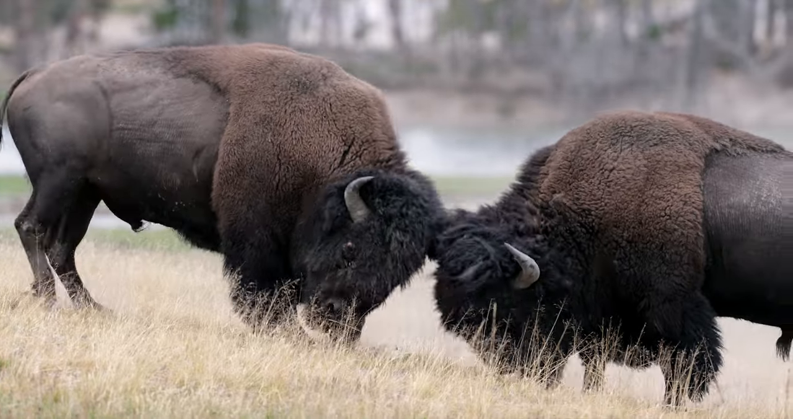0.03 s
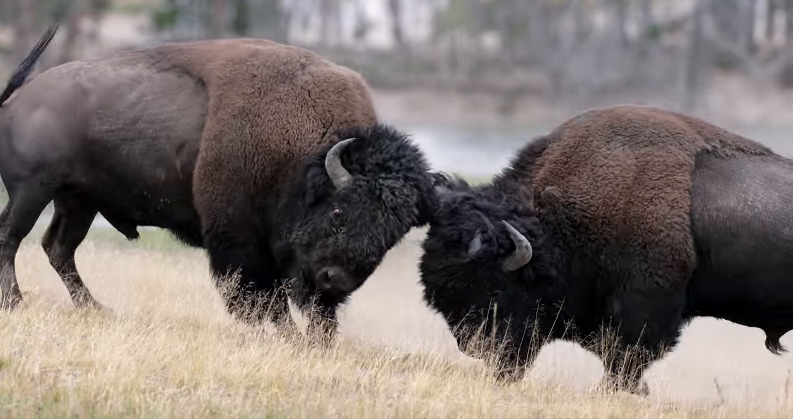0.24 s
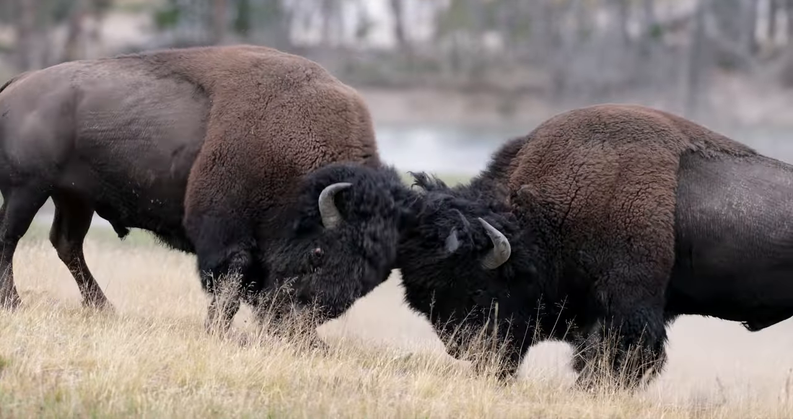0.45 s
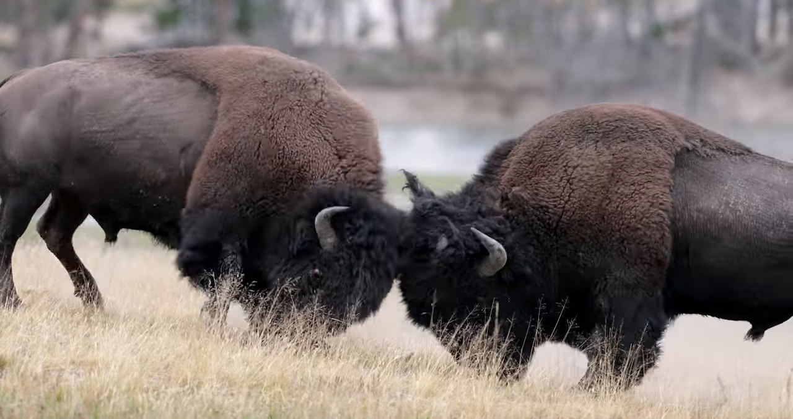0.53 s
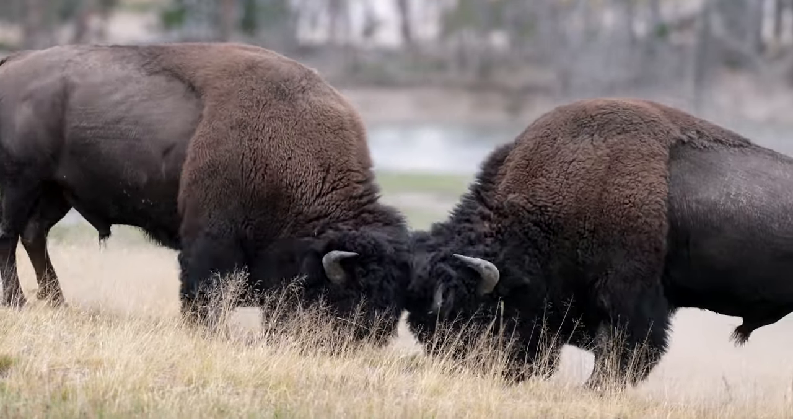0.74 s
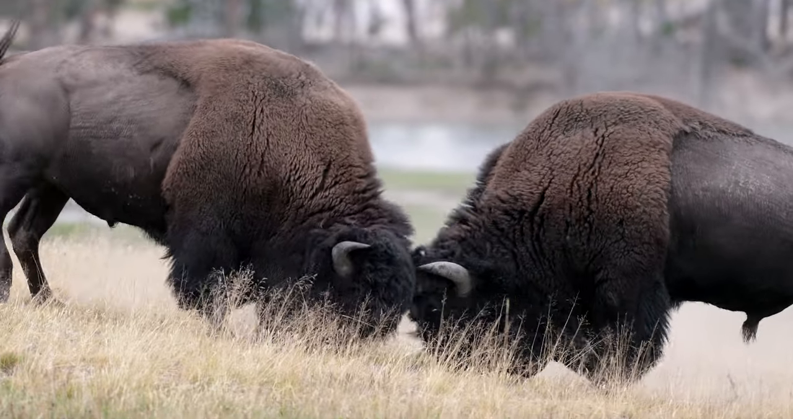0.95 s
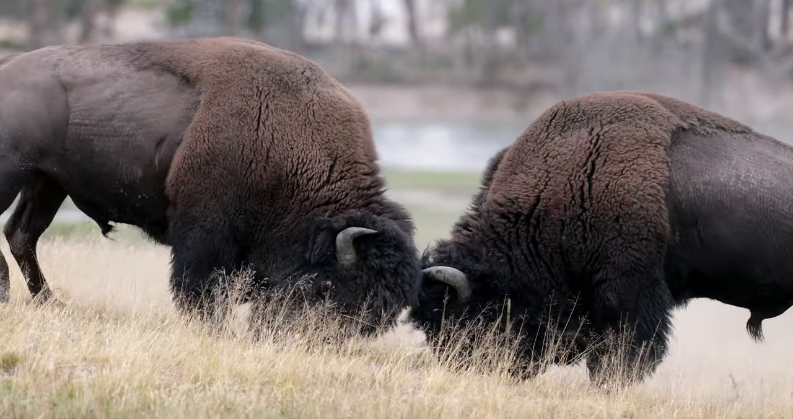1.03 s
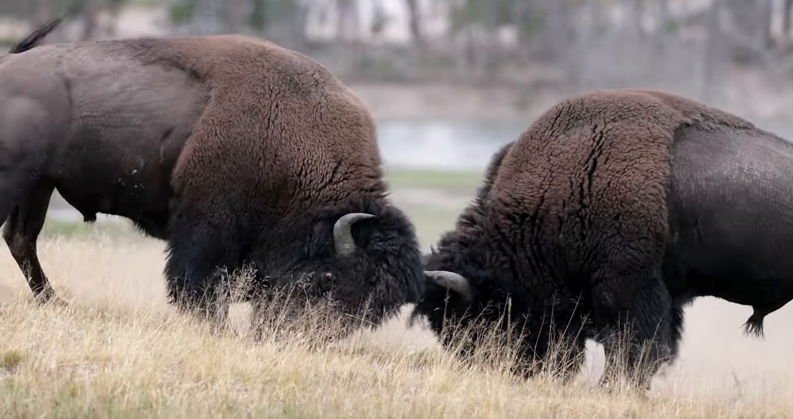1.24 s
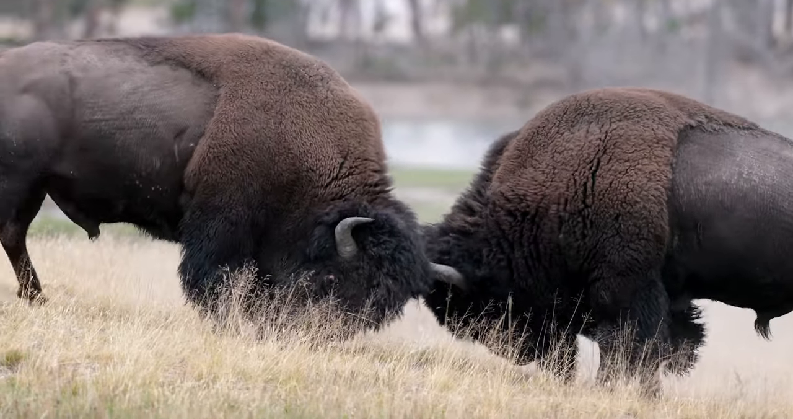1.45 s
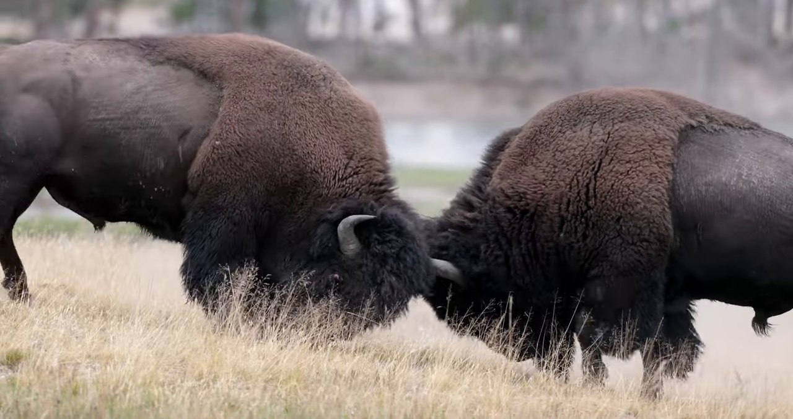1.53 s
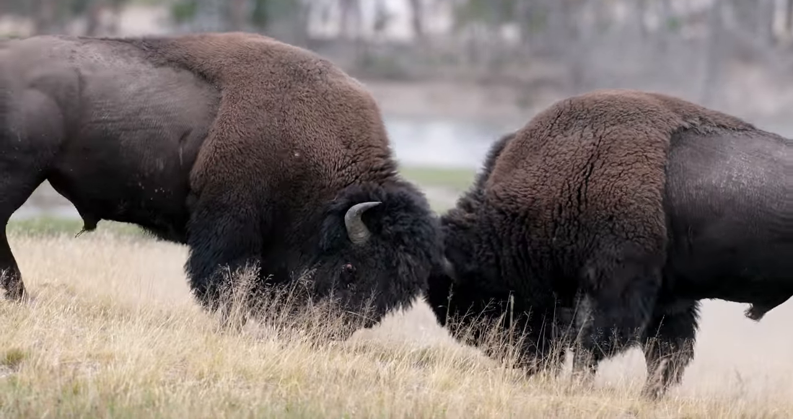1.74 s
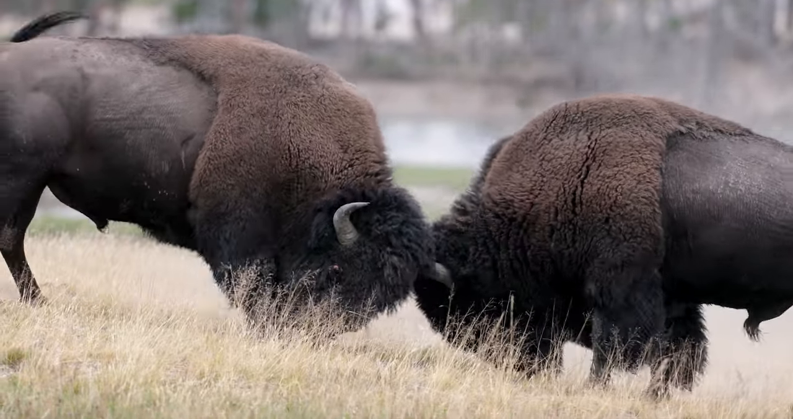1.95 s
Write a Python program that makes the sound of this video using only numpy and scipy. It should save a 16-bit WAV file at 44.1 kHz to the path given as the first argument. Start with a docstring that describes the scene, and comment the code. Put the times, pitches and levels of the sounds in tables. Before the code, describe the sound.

One deep, guttural bison bellow flaps and rasps, slows raggedly, then fades into soft hums and breath.

```python
"""A bison bull bellows once while it shoves a rival in open grassland, over a low wind, all hard left.
Crackles of air, a faint nasal ring and a soft hum open the call. Then slack vocal folds flap about 58 times
a second: each flap strikes a deep throat resonance, the chest and a rattle of higher resonances, and chops
rasping air, with whistling snorts and a thin hiss. The flaps slow and turn ragged, then the voice
dies into soft hums, crackles and airflow; resonators, decaying sines and shaped noise make the sounds."""
import sys
import numpy as np
from scipy import signal
from scipy.fft import rfft, irfft
from scipy.io import wavfile
from scipy.ndimage import uniform_filter1d, map_coordinates

SR = 44100
rng = np.random.default_rng(int(sys.argv[2]) if len(sys.argv) > 2 else 0)


def store_wav(level_fs):
    """Save 16-bit WAV to argv[1]."""
    pcm = np.round(np.clip(np.atleast_2d(level_fs), -1, 1) * 32767)
    wavfile.write(sys.argv[1], SR, pcm.T.astype(np.int16))


N = 88200  # samples, two seconds

# Levels of the sources are set before scene() doubles them on the left.
# tone of one soft flap: freq_hz [Hz], gain_db [dB]
FLAP_TONE = [(25, 0), (60, -9.5), (115, 1.5), (180, 2), (240, 8), (300, -2), (380, -9), (540, -7),
             (650, -29), (1500, -47.5), (6000, -95)]


def amp(db):
    """Decibels to gain."""
    return 10 ** (np.asarray(db) / 20)


def unit(x):
    """Scale to rms 1."""
    return x / np.sqrt(np.mean(x ** 2) + 1e-20)


def steady(x, size=3500):
    """Even out the short-term rms near 1 over size samples, keeping the single flaps."""
    power = uniform_filter1d(uniform_filter1d(unit(x) ** 2, size), size)
    return unit(x) / np.sqrt(np.abs(power) + .01)  # the floor leaves silence quiet


def clock():
    """Time of each sample in seconds."""
    return np.arange(N) / SR


def curves(rows):
    """One value per sample for each column after the time."""
    time_s, *columns = np.transpose(rows)
    return [np.interp(clock(), time_s, column) for column in columns]


def wobble(rate):
    """A smooth random curve, rate knots a second."""
    knots = rng.standard_normal(int(N * rate / SR) + 4)
    return map_coordinates(knots, [clock() * rate])


def swell(centre_s, length_s):
    """A bell-shaped rise and fall, down to exp(-2) at length_s either side."""
    return np.exp(-2 * ((clock() - centre_s) / length_s) ** 2)


def filtered(x, response):
    """Filter x by a response given as a function of frequency."""
    spectrum = rfft(x, 2 * N)
    return irfft(spectrum * response(np.fft.rfftfreq(2 * N, 1 / SR)))[..., :N]


def coloured(x, points):
    """Causal, minimum-phase filter through (Hz, dB) points."""
    freq_hz, gain_db = np.transpose(points)

    def response(f):
        log_gain = np.log(amp(np.interp(np.log(f + 1), np.log(freq_hz), gain_db)))
        cepstrum = irfft(log_gain)
        # folding the cepstrum forward in time gives the minimum phase
        return np.exp(rfft(np.r_[cepstrum[0], 2 * cepstrum[1:N], np.zeros(N)]))
    return filtered(x, response)


def noise(points):
    """Coloured noise of rms 1."""
    return unit(coloured(rng.standard_normal(N), points))


def resonate(x, modes):
    """Ring x through parallel (Hz, width Hz, dB) resonances."""
    def response(f):
        return sum(amp(db) * 1j * f * width / (hz * hz - f * f + 1j * f * width)
                   for hz, width, db in modes)
    return filtered(x, response)


def impulses(times, sizes):
    """One impulse at each time."""
    places = np.clip(np.round(times * SR).astype(int), 0, N - 1)
    return np.bincount(places, sizes, N)


def linger(x, decay_s):
    """Give each impulse an exponential tail."""
    return signal.lfilter([1], [1, -np.exp(-1 / (decay_s * SR))], x)


def bellow():
    """Flapping folds push the boom and chest, strike the rattle and chop the rasping air."""
    # middles: level_db [dB] of one flap; treble: level_db [dB]; first column time_s [s]
    voice = [(0.03, -57, -61.5), (0.17, -36.5, -46), (0.26, -27, -35), (0.48, -25, -34.5),
             (0.78, -25, -35.5), (1.05, -28.5, -35), (1.25, -28.5, -37.5), (1.4, -39.5, -39.5),
             (1.58, -41.5, -44), (1.66, -68.5, -60.5)]
    flap_scatter_db, rattle_scatter_db = 1.1, 2.2
    puff_lead_s, puff_scatter_s = .001, .0025  # air escapes just before the folds slap shut
    boom_share, treble_share = 0.4, 0.27  # how much of an accent reaches the low and high parts

    times, accents = flap_times()
    # the accented flaps take no scatter
    scatter = rng.standard_normal((N, 5))[:len(times)].T * (accents == 0)
    size, edge, bite, slip, stagger = scatter
    push = -amp(boom_share * accents + flap_scatter_db * size)
    middle_db, treble_db = curves(voice)
    hard_db = np.interp(times, clock(), middle_db) + accents + rattle_scatter_db * edge
    sharp_db = treble_share * accents + rattle_scatter_db * bite
    puff_times = times - puff_lead_s + puff_scatter_s * stagger

    low = boom(times, push) + chest_thud(times, push, slip)
    buzz, rasping = high_buzz(puff_times, sharp_db), rasp(puff_times, sharp_db)
    treble = amp(treble_db) * (amp(-5) * buzz + amp(-3.5) * rasping)
    voiced = np.interp(clock(), [.14, .18, 1.58, 1.64], [0, 1, 1, 0])
    mouth_open = np.interp(clock(), [1.65, 1.85], [1, 0])
    return voiced * boom_breaks() * low + mouth_open * (middle_rattle(times, hard_db) + treble)


def flap_times():
    """Uneven flaps of the folds that fall into step with each accent: times and accents in dB."""
    # flapping before the accents shift it: time_s [s], rate_hz [flaps per s], timing scatter_ms [ms]
    flaps = [(0.15, 56, .5), (0.3, 59, .4), (0.49, 61, .4), (0.6, 58, .3), (0.8, 56, .5), (0.96, 58, .3),
             (1.2, 54, .6), (1.3, 42, 2), (1.42, 34, 2.5), (1.6, 39, 3)]
    # flaps that stand out, most as hard pops, each restarting the rhythm:
    # start_s [s], accent_db [dB against the other flaps; weaker in the boom and treble]
    pops = [(0.2791, -9.5), (0.3643, 3), (0.396, 5.5), (0.415, 4.5), (0.448, 7.5), (0.48, 6), (0.568, 7),
            (0.6671, 5.5), (0.719, 3), (0.755, 6.5), (0.773, -2), (0.853, 4.5), (0.9211, -0.5),
            (1.0561, 10.5), (1.125, 12.5), (1.16, 5.5), (1.223, -2.5), (1.2707, 9), (1.2941, 7.5),
            (1.373, 7.5), (1.402, 10.5), (1.4324, 3.5), (1.492, 4)]
    rate, scatter_ms = curves(flaps)
    pop_s, pop_db = np.transpose(pops)
    cycles = np.cumsum(rate) / SR
    at_pop = np.interp(pop_s, clock(), cycles)
    # stretch the cycle count so that each pop falls on a whole flap
    steps = np.maximum(1, np.round(np.diff(at_pop, prepend=0)))
    whole = np.cumsum(steps).astype(int)
    cycles = cycles + np.interp(clock(), pop_s, whole - at_pop)
    times = np.interp(np.arange(int(cycles[-1])), cycles, clock())
    jitter = rng.standard_normal(N)[:len(times)]
    times += jitter * np.interp(times, clock(), scatter_ms) / 1000
    accents = np.zeros(len(times))
    times[whole], accents[whole] = pop_s, pop_db
    return times, accents


def boom(times, push):
    """The flaps drive the deep throat resonance at a drawn level."""
    # level of the deep resonance: time_s [s], level_db [dB]
    boom_level = [(0.19, -33), (0.25, -20), (0.366, -16), (0.55, -17.5), (0.626, -13), (0.675, -19),
                  (0.722, -14.5), (0.81, -15), (0.89, -24.5), (0.96, -16), (1.035, -22.5), (1.165, -17),
                  (1.33, -25.5), (1.43, -26), (1.62, -35.5)]
    return amp(curves(boom_level)[0]) * steady(deep(impulses(times, push)), size=3000)


def deep(x):
    """The lowest throat resonance, a one-pole ring on a carrier that glides with the throat's shape."""
    # it rises a little at the height of the push: time_s [s], pitch_hz [Hz]
    throat = [(0.2, 214), (0.35, 242), (0.48, 243), (0.6, 236.6), (1.0, 228.5), (1.3, 227), (1.8, 225.7)]
    width_hz = 30
    turn = np.exp(2j * np.pi * np.cumsum(curves(throat)[0]) / SR)
    ring = linger(coloured(x, FLAP_TONE) / turn, 1 / (np.pi * width_hz))
    return np.real(turn * ring)


def chest_thud(times, push, slip):
    """Each flap knocks one broad low chest resonance, most of them a little early or late."""
    # level of the thud: time_s [s], level_db [dB]
    thud_level = [(0.15, -54), (0.3, -35), (0.9, -31), (1.25, -32.5), (1.45, -30), (1.6, -37.5)]
    chest_hz, width_hz, slip_s = 115, 180, 0.0011
    knocks = coloured(impulses(times + slip_s * slip, push), FLAP_TONE)
    return amp(curves(thud_level)[0]) * steady(resonate(knocks, [(chest_hz, width_hz, 0)]))


def boom_breaks():
    """Gain curve by which the boom and thud dip for a moment."""
    # dips: centre_s [s], depth_db [dB]
    breaks = [(0.425, -2), (0.577, -8), (0.662, -6), (0.759, -8), (0.835, -11), (0.911, -20),
              (1.049, -13.5), (1.26, -11.5), (1.325, -16), (1.481, -2)]
    return amp(sum(db * swell(s, .011) for s, db in breaks))


def middle_rattle(times, flap_db):
    """Flaps strike the middle resonances of the throat."""
    # pitch_hz [Hz], width_hz [Hz], level_db [dB]
    middles = [(433, 38, -19), (562.2, 45, -11), (919.4, 76, 4), (1158, 51.3, -1)]
    return rattle(times, flap_db, middles, scatter_db=2)


def high_buzz(times, flap_db):
    """Flaps strike the high, narrow resonances of the throat into an even buzz."""
    # pitch_hz [Hz], width_hz [Hz], level_db [dB]
    highs = [(1397, 18, -2), (1586, 17, -0.5), (1800, 18, 0), (2024, 17, -8.5), (2516, 47, -4),
             (2770, 34, -5.5), (3080, 38, -7)]
    return steady(rattle(times, flap_db, highs, scatter_db=5.5))


def rattle(times, flap_db, modes, scatter_db):
    """Each flap rings decaying sines afresh, each a little different in pitch and strength."""
    # tone of the open mouth: freq_hz [Hz], gain_db [dB]
    mouth = [(150, -7.5), (420, 6.5), (590, 4.5), (640, -4), (770, -9), (880, -3), (3200, -4),
             (3900, -18.5), (4700, -11), (9000, -37.5)]
    detune_ratio, attack_s = .012, 0.0022
    t = np.arange(SR // 8) / SR
    hz, width, level = np.transpose(modes)[..., None]
    ring = np.zeros(N + SR)
    for s, db in zip(times, flap_db):
        detune, size, phase = rng.standard_normal((3, len(modes), 1))
        tones = np.sin(2 * np.pi * (hz * (1 + detune_ratio * detune) * t + phase))
        tones *= np.exp(-np.pi * width * t)
        gains = amp(db + level + scatter_db * np.clip(size, -2, 1))
        burst = np.sum(gains * tones, axis=0) * (1 - np.exp(-t / attack_s))
        ring[max(0, round(s * SR)):][:len(t)] += burst
    return coloured(ring[:N], mouth)


def rasp(puff_times, puff_db):
    """Turbulent air, chopped into a decaying puff per flap over a steady leak."""
    # air leaking between flaps, growing as the folds slacken:
    # time_s [s], strength [times the rms of the puffs]
    leak = [(0.4, .3), (1.1, .55), (1.55, 1.3)]
    # tone of the rasp: freq_hz [Hz], density_db [relative dB per Hz]
    rasp_tone = [(200, -6.5), (570, -2), (720, -1.5), (920, -3.5), (1350, 4), (1800, 4.5), (2150, 1),
                 (3100, -7.5), (3550, -14.5), (3900, -41), (4700, -20.5), (5500, -29.5), (6700, -37),
                 (8000, -58)]
    puffs = unit(linger(impulses(puff_times, amp(puff_db)), .0035))
    airflow = curves(leak)[0] + puffs
    return steady(coloured(airflow * rng.standard_normal(N), rasp_tone))


def hum():
    """With little pressure the voice is an almost pure, gliding sine near the deep resonance."""
    # hums before and after the rattle:
    # centre_s [s], length_s [s], pitch_hz [Hz], glide [Hz per s], level_db [dB rms at the peak]
    hums = [(0.13, 0.064, 220.8, 219, -30), (1.642, 0.037, 224, -100, -32), (1.736, 0.038, 220.7, -21, -27),
            (1.816, 0.028, 234.8, 5, -28.5)]
    # overtone lingering as the call ends: centre_s [s], length_s [s], pitch_hz [Hz], level_db [dB rms]
    overtone = (1.7, .2, 470, -61)
    waver = .2  # radians of phase
    out = np.zeros(N)
    for s, length, hz, glide, db in hums:
        t = clock() - s
        phase = 2 * np.pi * (hz * t + glide * t * t / 2) + waver * wobble(90)
        out += amp(db) * swell(s, length) * np.sin(phase)
    s, length, hz, db = overtone
    phase = 2 * np.pi * hz * clock() + waver * wobble(45)
    out += amp(db) * swell(s, length) * np.sin(phase)
    return np.sqrt(2) * out  # sine peak to rms


def nose():
    """Air noise rings one narrow nasal resonance, filtered twice, as the call starts."""
    # faint rings: centre_s [s], length_s [s], level_db [dB]
    nasal = [(0.122, 0.017, -43), (0.185, 0.012, -43)]
    mode = [(710, 15, 0)]  # Hz, width Hz, dB
    ring = steady(resonate(resonate(rng.standard_normal(N), mode), mode))
    return ring * sum(amp(db) * swell(s, length) for s, length, db in nasal)


def muzzle():
    """Turbulent air at the muzzle: snorts, thin hiss, crackles and soft airflow."""
    return snorts() + push_hiss() + soft_air()


def snorts():
    """Short swells of noise with a whistling peak near 1.9 kHz."""
    # centre_s [s], length_s [s], level_db [dB]
    snort_bursts = [(0.177, 0.033, -42.5), (0.21, 0.0081, -33), (0.241, 0.026, -34), (0.249, 0.0043, -31.5),
                    (0.277, 0.008, -33), (0.98, 0.0021, -33), (1.596, 0.027, -43)]
    # freq_hz [Hz], density_db [relative dB]
    snort_tone = [(500, -29.5), (1600, -14), (1920, 7), (2100, -2.5), (2400, -13), (3200, -19.5),
                  (9000, -57)]
    envelope = sum(amp(db) * swell(s, length) for s, length, db in snort_bursts)
    return envelope * steady(noise(snort_tone), size=700)


def push_hiss():
    """Flickering high noise, strongest at the height of the push."""
    # time_s [s], level_db [dB before the flicker]
    hiss_level = [(0.1, -74), (0.39, -57.5), (0.6, -61), (1.2, -73.5)]
    # freq_hz [Hz], density_db [relative dB]
    hiss_tone = [(2000, -11.5), (4300, 4), (6300, -3.5), (7500, -9.5), (15000, -27.5)]
    flicker_db = 3.0 * wobble(120)
    return amp(curves(hiss_level)[0] + flicker_db) * noise(hiss_tone)


def soft_air():
    """Crackles as the call starts and fades, and noise flowing through the throat at the end."""
    # decaying crackles: start_s [s], level_db [dB]
    crackle_hits = [(0.056, -47), (0.085, -41), (0.107, -40.5), (0.16, -41.5), (0.18, -33.5),
                    (1.657, -55.5), (1.71, -50.5), (1.732, -48), (1.805, -56)]
    # closing airflow: time_s [s], level_db [dB] at the deep resonance, level_db [dB] of the airy part
    airflow = [(1.45, -79, -68.5), (1.6, -38.5, -62), (1.72, -47.5, -65.5), (1.82, -34, -65),
               (1.89, -45.5, -51.5), (2.0, -43.5, -59.5)]
    # freq_hz [Hz], density_db [relative dB]
    air_tone = [(150, 4.5), (450, 5.5), (620, 1.5), (900, 9), (1400, 4), (2400, -0.5), (3600, -30.5),
                (9000, -53)]
    air_top_hz = 4500
    start_s, level_db = np.transpose(crackle_hits)
    crackles = linger(impulses(start_s, amp(level_db)), 0.0095)
    deep_db, air_db = curves(airflow)
    air = (amp(air_db) + crackles) * noise(air_tone)
    air = filtered(air, lambda hz: 1 / (1 + (hz / air_top_hz) ** 4))
    return amp(deep_db) * steady(deep(rng.standard_normal(N))) + air


def wind():
    """Low wind: coloured noise whose level drifts slowly at random."""
    # freq_hz [Hz], density_db [relative dB per Hz]
    wind_tone = [(15, -2.5), (28, 1), (60, -2.5), (110, 1.5), (230, -5.5), (400, -17), (1500, -32),
                 (4000, -54), (15000, -61.5)]
    return amp(-47.5 + wobble(4.8)) * noise(wind_tone)


def scene():
    """Bison and wind, all in the left channel."""
    pan = 1  # 1 is hard left, 0 is centre
    field = bellow() + hum() + nose() + muzzle() + wind()
    return np.array([(1 + pan) * field, (1 - pan) * field])


def record(dry):
    """Both channels add their own faint hiss and end at the band limit."""
    self_noise_db, top_hz = -67.5, 15800  # noise level before the band limit
    hiss = amp(self_noise_db) * rng.standard_normal((2, N))
    return filtered(dry + hiss, lambda hz: hz < top_hz)


dry = scene()
out = record(dry)
store_wav(out)
```